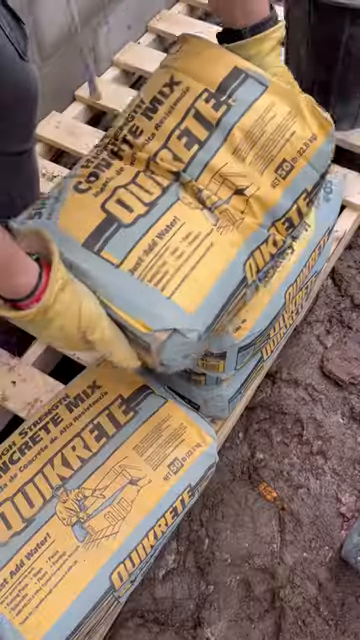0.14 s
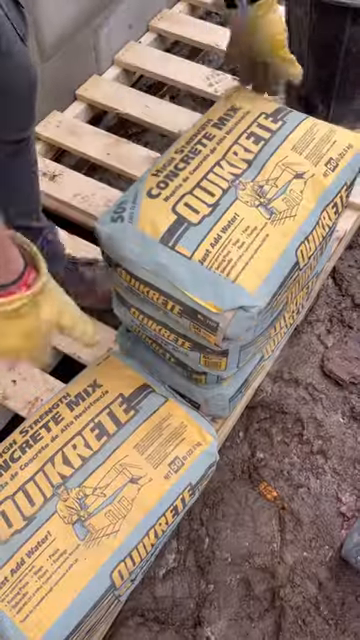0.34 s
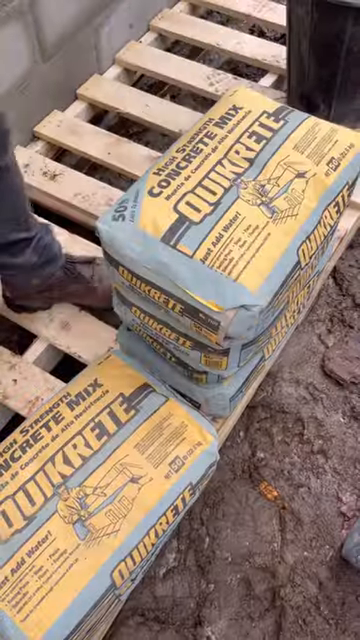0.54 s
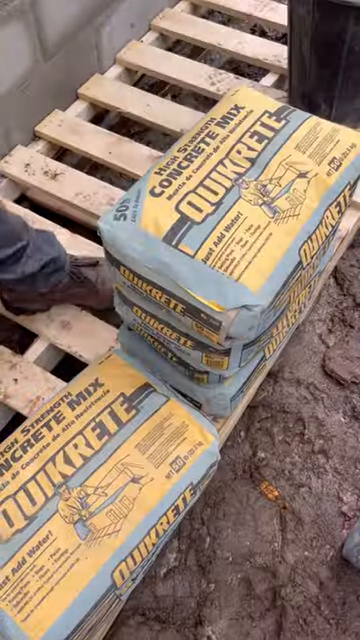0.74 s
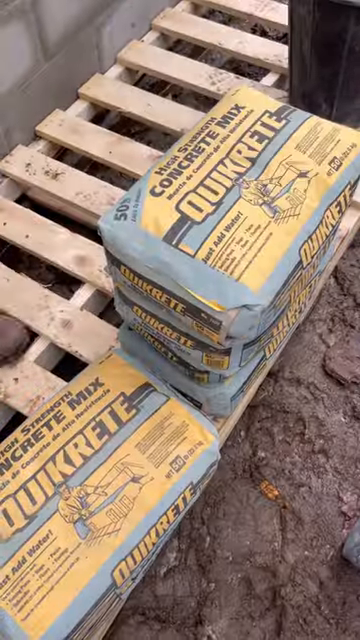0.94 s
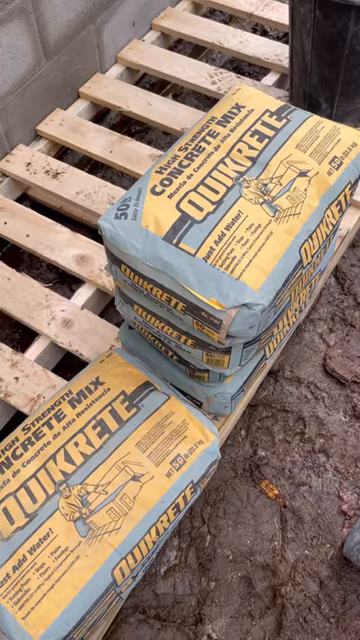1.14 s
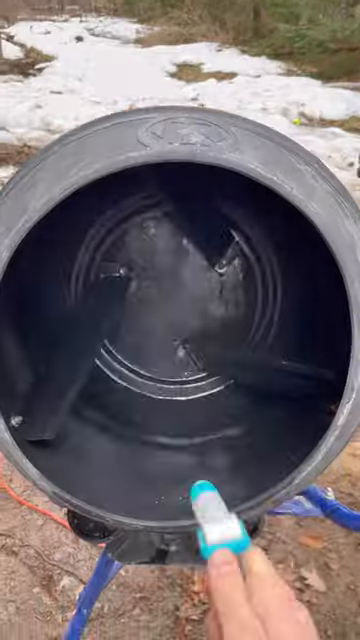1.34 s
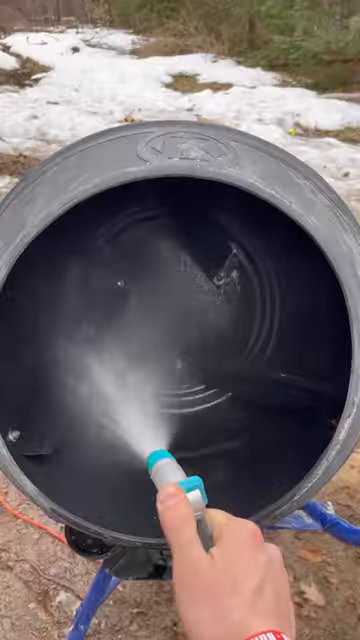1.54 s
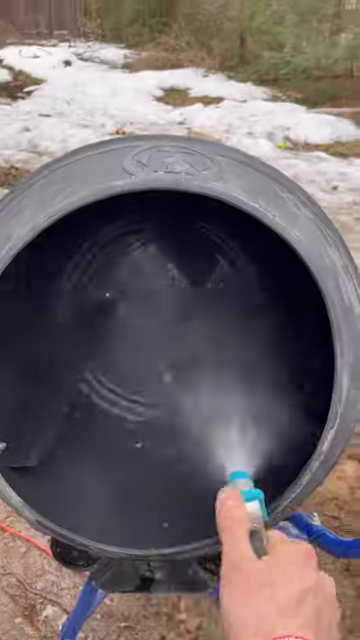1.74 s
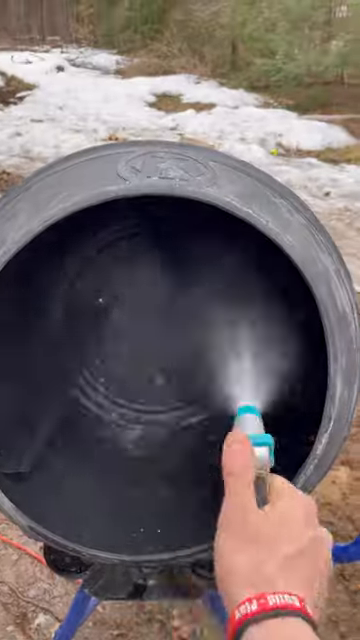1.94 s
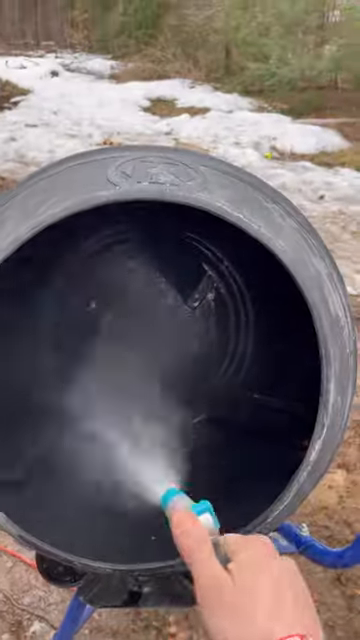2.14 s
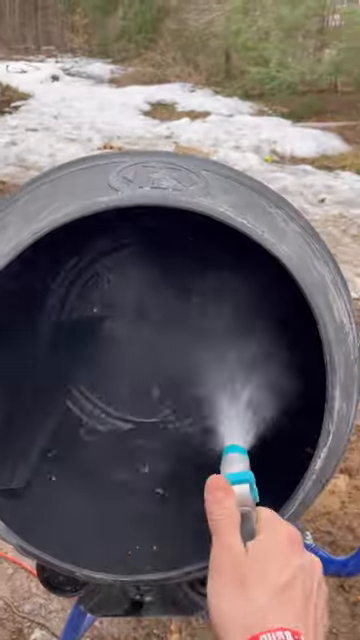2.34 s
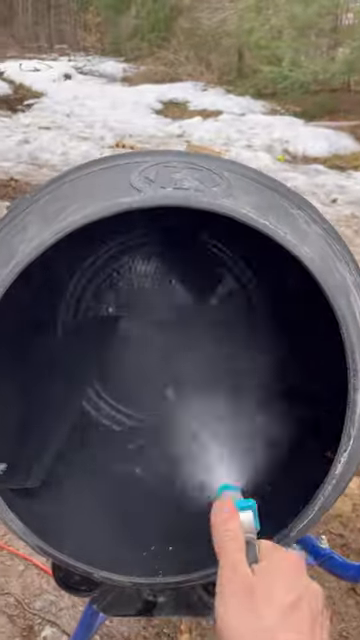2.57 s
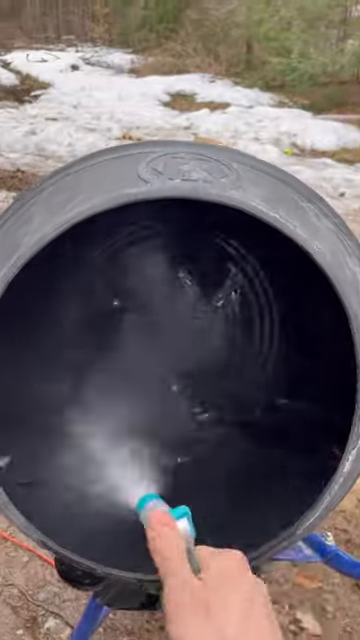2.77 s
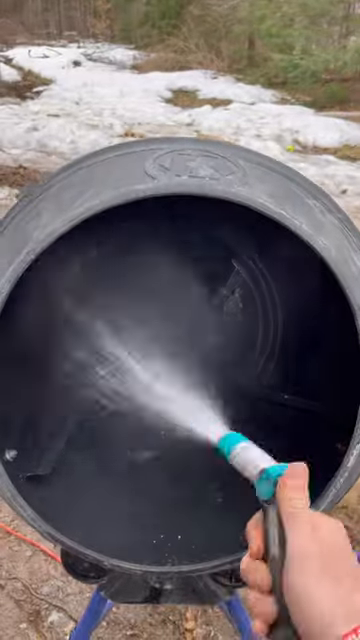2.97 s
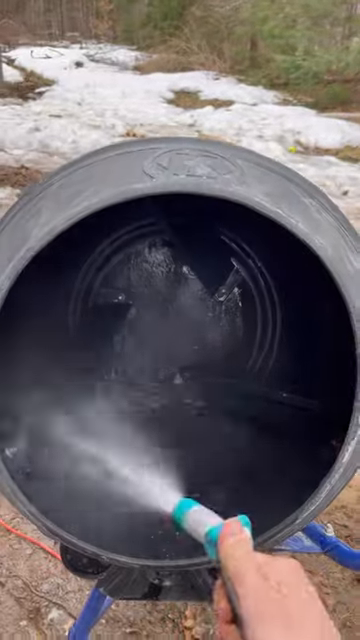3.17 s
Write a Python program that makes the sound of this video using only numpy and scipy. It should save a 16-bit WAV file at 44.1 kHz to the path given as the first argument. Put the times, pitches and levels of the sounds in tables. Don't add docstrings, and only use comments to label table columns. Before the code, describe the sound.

Outdoors and close up, a paper sack of dry mix lands with a loud crunch and wooden thud, followed by faint rustles and boot taps; an abrupt cut brings a nozzle click and sustained spray hissing inside a hollow drum.

```python
import sys
import numpy as np
from scipy import signal
from scipy.fft import rfft, irfft
from scipy.io import wavfile
from scipy.ndimage import map_coordinates

SR = 44100
rng = np.random.default_rng(int(sys.argv[2]) if len(sys.argv) > 2 else 0)


def convert_level_to_amplitude(level_db):
    exponent = np.asarray(level_db, float) / 20
    return 10 ** exponent


def dump(signal):
    limited = np.clip(np.atleast_2d(signal).T, -1, 1)
    pcm = np.round(limited * 32767).astype(np.int16)
    wavfile.write(sys.argv[1], SR, pcm)


N = 143325
CUT_S = 1.323
SIDES = np.array([[1], [-1]])


def rms_one(x):
    return x / np.sqrt(np.mean(x ** 2) + 1e-20)


def curve(rows):
    s, db = np.transpose(rows)
    return convert_level_to_amplitude(np.interp(np.arange(N) / SR, s, db, left=-200, right=-200))


def shape(x, points):
    hz, db = np.transpose(points)
    f = np.fft.rfftfreq(N, 1 / SR) + 1
    tilt = np.interp(np.log(f), np.log(hz), db)
    tilt = tilt - 30 * np.maximum(np.log2(hz[0] / f), 0)
    return irfft(rfft(x) * convert_level_to_amplitude(tilt), N)


def drift(rate):
    r = np.exp(-40 * np.pi * rate / SR)
    slow = signal.lfilter([1], [1, -2 * r, r * r], rng.standard_normal(N // 20 + 2002))[2000:]
    return np.interp(np.arange(N) / 20, np.arange(len(slow)), rms_one(slow))


def peak(x, hz, width_hz):
    r = np.exp(-np.pi * width_hz / SR)
    poles = [1, -2 * r * np.cos(2 * np.pi * hz / SR), r * r]
    return signal.lfilter(np.array([1, 0, -1]) * (1 - r * r) / 2, poles, x)


def ring(x, hz, t60):
    r, w = convert_level_to_amplitude(-60 / (t60 * SR)), 2 * np.pi * hz / SR
    return signal.lfilter([0, np.sin(w)], [1, -2 * r * np.cos(w), r * r], x + 1e-18)


def butter(x, order, hz, kind="low"):
    return signal.sosfilt(signal.butter(order, hz, kind, fs=SR, output="sos"), x)


def grains(rate, spread_db, share):
    sizes = convert_level_to_amplitude(spread_db * np.minimum(rng.exponential(1, N), 3)) * rng.choice([-1, 1], N)
    clicks = rms_one(sizes * (rng.random(N) < rate / SR))
    share = np.clip(share, 0, 1)
    return np.sqrt(share) * clicks + np.sqrt(1 - share) * rng.standard_normal(N)


def swells(rows, length=None):
    t = np.arange(N) / SR
    return sum(convert_level_to_amplitude(row[-1]) * np.exp(-(2 * (t - row[0]) / (length or row[1])) ** 2) for row in rows)


def snaps(rows, sharp, t60):
    size = 4000
    out, t = np.zeros(N + size), np.arange(size) / SR
    for s, db, hz in rows:
        burst = rng.standard_normal(size) * convert_level_to_amplitude(-60 * t / t60) * np.minimum(t / 0.00088, 1)
        broad = butter(np.diff(burst, prepend=0), 2, min(5.0 * hz, 20000))
        burst = 0.56 * broad + sharp * peak(burst, hz, 0.62 * hz)
        start = int(s * SR)
        out[start:start + size] += convert_level_to_amplitude(db) * burst / np.abs(burst).max()
    return out[:N]


def wander(x):
    at = np.cumsum(1 + 0.018 * drift(6.0))
    return map_coordinates(x, [at % (N - 1)], order=3)


def spread(mid, points, lag):
    side = shape(np.roll(signal.hilbert(mid).imag, lag), points)
    return mid + side * convert_level_to_amplitude(3.0 * drift(6.9)) * SIDES


# f/Hz, level/dB
YARD_SPECTRUM = [(35, -55), (60, -9.5), (135, -6.5), (246, -15.5), (271, -17.5), (1000, -43.5), (1300, -75),
                 (2200, -120)]


def yard_rumble():
    return convert_level_to_amplitude(-69 + 2.5 * drift(20)) * rms_one(shape(rng.standard_normal(N), YARD_SPECTRUM))


def rumble_apart():
    return convert_level_to_amplitude(-69 - 9.5) * rms_one(peak(rng.standard_normal(N), 240, 300)) * SIDES


# f/Hz, level/dB
WOODS_SPECTRUM = [(59, -57), (100, -30), (381, -10.5), (3250, -22), (10700, -28), (16000, -33)]


def woods_air():
    air = rms_one(np.array([shape(rng.standard_normal(N), WOODS_SPECTRUM) for side in range(2)]))
    air = convert_level_to_amplitude(-59) * (np.arange(N) < 1.46 * SR) * air
    return air[0] + convert_level_to_amplitude(-10.5) * air[1] * SIDES


# f/Hz, level/dB, t60/s
BOARD_MODES = [(165, 3, 0.07), (345, 0, 0.05), (600, 1, 0.03), (760, 1, .03), (940, -3, .02),
               (1340, 3, .04), (2650, -8, .025)]


def boot_step():
    t = np.arange(N) / SR - 1.089
    length_s, board_db, grit_db = 0.032, -52, -51.5
    fade = convert_level_to_amplitude(-260 * np.maximum(t, 0) - 600 * np.maximum(t - length_s, 0))
    drive = grains(2890, 2.4, 0.96) * np.clip(t / 0.0014, 0, 1) * fade
    board = sum(convert_level_to_amplitude(db) * ring(drive, hz, t60) for hz, db, t60 in BOARD_MODES)
    grit = signal.lfilter([1], [1, -0.75], drive)
    return convert_level_to_amplitude(board_db - 22.5) * board + convert_level_to_amplitude(grit_db) * grit


def hose_knock():
    start_s, level_db, t60_s, rise_s, stop_s = 1.2513, -35.3, 0.3, 0.00025, 0.0111
    sweep_turns, lag_s, end_hz = 1.012, 0.00025, 14
    t = np.maximum(np.arange(N) / SR - start_s, 0)
    turns = sweep_turns * np.log(1 + t / lag_s) + end_hz * t
    envelope = convert_level_to_amplitude(level_db - 60 * t / t60_s) * np.minimum(t / rise_s, 1) * np.clip((stop_s - t) / 0.004, 0, 1)
    knock = envelope * np.sin(2 * np.pi * turns)
    knock = signal.sosfiltfilt(signal.butter(2, 2800, fs=SR, output="sos"), knock)
    return knock * (1 + convert_level_to_amplitude(-19.5) * SIDES)


# t/s, peak level/dB, f/Hz
KNOCKS = [
    (.0, -51, 312),
    (.079, -39.5, 590),
    (.466, -56, 755),
    (.678, -50, 297),
    (.785, -57.5, 590),
    (1.15, -76, 300),
    (1.292, -57, 1110),
    (1.303, -65, 500),
]


def knocks():
    return snaps(KNOCKS, sharp=30.0, t60=0.058)


# t/s, level/dB
RUSTLE = [(0, -63.5), (.085, -53), (.13, -62), (.185, -61.5), (.4, -60.5), (.43, -67), (.47, -65),
          (.52, -60), (.56, -73.5), (.6, -55), (.66, -52), (.71, -67), (.76, -69), (1.0, -64),
          (1.08, -65.5), (1.16, -86.5), (1.24, -79.5), (1.322, -80)]
# f/Hz, level/dB
CLOTH = [(240, -49.5), (400, -26.5), (814, -11.5), (1420, -13.5), (1680, -9.5), (4500, -4.5), (8500, -7.5),
         (13000, -2.5)]
# t/s, length/s, level/dB
SLIDE = [
    (.232, 0.021, -35),
]


def handling():
    fibres = grains(3000, 3.0, 0.2)
    rustle = 0
    for k, hz in enumerate(np.geomspace(500, 15000, 9)):
        band = peak(fibres, hz, 0.6 * hz) * (-1) ** k / np.sqrt(hz)
        rustle = rustle + convert_level_to_amplitude(1.2 * drift(45)) * band
    rustle = rms_one(shape(rustle, CLOTH))
    slide = rms_one(peak(fibres, 13000, 5500))
    return rustle * curve(RUSTLE) + slide * swells(SLIDE)


# t/s, level/dB
THUMPS = [
    (0.25, -24.5),
    (0.263, -16.5),
    (0.281, -21.5),
    (.309, -40),
    (0.331, -34.5),
    (0.364, -43.5),
    (1.2626, -53.5),
    (1.297, -56),
    (1.311, -53),
]
# f/Hz, level/dB, t60/s
PALLET_MODES = [(126, -6, 0.12), (170, -4, 0.035), (378, -12, .04), (487, -15, 0.038), (720, -13.5, 0.048)]


def pallet_thumps():
    s, db = np.transpose(THUMPS)
    out = 0
    for hz, level_db, t60 in PALLET_MODES:
        clicks = np.zeros(N)
        clicks[(s * SR).astype(int)] = convert_level_to_amplitude(db + level_db)
        blows = signal.lfilter([0.12], [1, -0.88], clicks)
        out = out + ring(blows, hz, t60)
    return out


# t/s, level/dB
LANDING = [(.19, -66.5), (.228, -42.5), (.245, -39.5), (.249, -22.5), (.253, -26), (.258, -20.5),
           (.268, -21.5), (.273, -16.5), (.279, -22), (.282, -26.5), (.31, -49.5), (.335, -36.5),
           (.36, -65)]
# f/Hz, level/dB
PAPER = [(180, -18.5), (400, -7.5), (800, -10.5), (1500, -7), (2100, -11.5), (4440, -8), (16000, -13)]
# t/s, peak level/dB, f/Hz
SNAPS = [(.0525, -37.5, 11400), (.07, -30, 12100), (.077, -38, 3000), (.087, -36, 12000),
         (.123, -48, 12000), (.1535, -43, 4000), (.157, -32, 2800), (.2475, -14, 2500), (.2625, -14, 3030),
         (.274, -1.5, 4500), (.2945, -21, 7000), (.304, -23.5, 5150), (.325, -29.5, 3000),
         (.3325, -15, 3700), (.3625, -14.5, 6000), (.463, -45, 2880), (.59, -47, 2000), (.61, -35, 4430),
         (.653, -32, 5100), (.784, -52.5, 1500), (.7, -47.5, 4500), (.85, -53, 1990), (.918, -49, 4070),
         (1.27, -49, 3820), (1.312, -54, 5000)]


def sack_landing():
    crackle = grains(3200, 6.7, 0.28) * convert_level_to_amplitude(2.0 * drift(93))
    crackle = rms_one(shape(crackle, PAPER))
    return crackle * curve(LANDING) + snaps(SNAPS, sharp=1.8, t60=0.011)


# f/Hz, level/dB
SIDE_YARD = [(200, -46.5), (500, -29), (1200, -9.5), (3300, -28), (4800, -7.5), (8500, -2.5), (10200, 5),
             (11500, -16), (13500, -5)]


def yard():
    on = np.arange(N) < CUT_S * SR
    mid = (sack_landing() + handling() + knocks() + pallet_thumps() + boot_step() + yard_rumble()) * on
    for stage in range(2):
        mid = mid - peak(mid, 9630, 520)
    return spread(mid, SIDE_YARD, 61) + rumble_apart() * on + hose_knock()


# t/s, peak level/dB, f/Hz
TRIGGER = [
    (1.323, -41, 630),
    (1.435, -35, 510),
]


def trigger():
    return snaps(TRIGGER, sharp=5.4, t60=0.03)


# t/s, length/s, level/dB
PUFFS = [(1.64, 0.037, -66), (1.8, 0.1, -65.5), (1.87, 0.039, -66), (2.23, .06, -65), (2.31, 0.085, -69),
         (2.43, 0.045, -71), (2.5, 0.05, -72), (2.78, 0.19, -66.5), (3.16, 0.08, -64.5)]
# f/Hz, level/dB
PUFF_SPECTRUM = [(110, -30), (200, 6.5), (450, 4.5), (800, -6), (1500, -57)]


def air_puffs():
    puff = swells(PUFFS) * rms_one(shape(rng.standard_normal(N), PUFF_SPECTRUM))
    return puff * (1 + convert_level_to_amplitude(-14) * SIDES)


# t/s, level/dB
SLAPS = [
    (1.9, -57),
    (1.94, -58),
    (2.97, -60),
    (3.055, -55),
]


def water_slaps():
    hz, length_s = 244, 0.039
    slap = peak(peak(peak(rng.standard_normal(N), hz, 140), hz, 170), hz, 200)
    return swells(SLAPS, length_s) * rms_one(slap)


# t/s, level/dB
MISTS = [(1.52, -41), (1.61, -32.5), (1.83, -29.5), (2.0, -35.5), (2.2, -35), (2.33, -37), (2.43, -36),
         (2.52, -44), (2.64, -32), (2.86, -32.5), (2.99, -38)]


def mist_bursts():
    return swells(MISTS, 0.05) * rms_one(butter(grains(5400, 1.6, 0.66), 3, 9700, "high"))


# f/Hz, width/Hz, level/dB
PADDLE_MODES = [(1500, 97, 2), (1734, 137, 1.5), (1900, 127, 2.5), (2025, 29, 4), (2325, 82, -1)]
# t/s, length/s, level/dB
PADDLE_HITS = [(1.472, 0.024, -40.5), (1.497, 0.035, -36.5), (1.527, 0.04, -33.5), (1.7, 0.051, -40),
               (1.76, 0.094, -49), (2.045, 0.023, -38.5), (2.175, 0.055, -44), (2.39, 0.027, -41.5),
               (2.59, 0.086, -45), (2.78, 0.058, -48), (2.915, 0.067, -37.5), (2.962, 0.038, -36.5),
               (3.06, 0.22, -50.5), (3.21, 0.19, -49)]


def paddle_rasp(drops):
    rasp = 0.4 * peak(drops, 3060, 2270)
    for hz, w, db in PADDLE_MODES:
        rasp = rasp + convert_level_to_amplitude(db + 2.2 * drift(30)) * peak(peak(drops, hz, 6 * w), hz, w)
    return swells(PADDLE_HITS) * rms_one(rasp)


# f/Hz, width/Hz, level/dB
CAVITY_MODES = [(351.5, 61, -11.5), (459.7, 27, -9.5), (536.8, 44.4, 0.5), (724, 110, -16.5)]
# t/s, level/dB
FLARES = [(1.58, -54), (1.69, -58), (1.86, -52.5), (1.96, -51), (2.0, -65), (2.15, -44.5), (2.33, -43.5),
          (2.54, -44.5), (2.64, -50), (2.68, -54), (2.81, -46.5), (3.07, -74), (3.15, -55.5), (3.24, -46)]
# t/s, level/dB
CROSS_FLARES = [
    (1.52, -57.5),
    (1.79, -46),
    (2.42, -53),
    (2.62, -49),
    (2.9, -66),
    (3.19, -55),
]


def cavity_hum(drops, force):
    fill_s, flare_s = 0.086, 0.044
    opening = force / np.median(force[force > 1e-4])
    pole = 1 / (fill_s * SR)
    fill = signal.lfilter([pole], [1, pole - 1], np.minimum(opening, 1))
    hum = sum(convert_level_to_amplitude(db + drift(25.0)) * peak(peak(drops, hz, 3 * w), hz, w) for hz, w, db in CAVITY_MODES)
    cross = rms_one(peak(peak(drops, 510, 130), 457, 55))
    level = convert_level_to_amplitude(-55.5) * fill + swells(FLARES, flare_s)
    return level * rms_one(hum) + swells(CROSS_FLARES, flare_s) * cross


# f/Hz, width/Hz, level/dB
WALL_MODES = [(2020, 100, -8), (4160, 284, -1.5), (5000, 570, -1), (7380, 600, -6.5), (8340, 380, -3.5),
              (10220, 890, -8), (14100, 220, -5)]
# f/Hz, level/dB
SPRAY = [(120, -19), (300, -13), (535, -3.5), (1070, -8), (2000, -3), (5000, -6), (9000, -1.5),
         (16000, -1.5)]
# t/s, level/dB
SURGES = [(1.52, -38), (1.6, -45), (1.65, -40), (1.685, -44), (1.735, -43.5), (1.92, -48), (2.0, -39.5),
          (2.05, -63), (2.18, -39.5), (2.33, -69), (2.383, -36.5), (2.42, -52), (2.555, -46), (2.59, -40),
          (2.645, -44), (2.7, -43), (2.88, -48), (2.95, -43.5), (3.06, -40), (3.145, -41)]


def wall_hiss(drops, force):
    wall = drops * convert_level_to_amplitude(1.0 * drift(25))
    for hz, w, db in WALL_MODES:
        wall = wall + convert_level_to_amplitude(db + 12 + 1.8 * drift(18)) * wander(peak(drops, hz, w))
    hiss = force * convert_level_to_amplitude(0.7 * drift(40)) * rms_one(shape(wall, SPRAY))
    surge_hz, width_hz, surge_s = 4500, 2760, 0.026
    surge = rms_one(peak(peak(wall, surge_hz, width_hz), surge_hz, 2 * width_hz))
    return hiss + swells(SURGES, surge_s) * surge


# t/s, level/dB
JET_FORCE = [(1.41, -66), (1.432, -51), (1.435, -41.5), (1.447, -35), (1.452, -49), (1.47, -35.5),
             (1.522, -32), (1.555, -34.5), (1.79, -35), (2.0, -35), (2.1, -36.5), (2.24, -36), (2.3, -34),
             (2.48, -35.5), (2.55, -34.5), (2.79, -36), (2.9, -36.5), (3.25, -39)]


def jet():
    force = curve(JET_FORCE)
    drops = grains(9000, 3.9, 0.25)
    driven = wall_hiss(drops, force) + cavity_hum(drops, force) + paddle_rasp(drops)
    return driven + mist_bursts() + water_slaps()


# f/Hz, level/dB
SIDE_DRUM = [(300, -39), (1500, -41), (3800, -34.5), (4900, -17.5), (6200, -43), (12500, -30.5),
             (15500, -15)]


def drum():
    on = np.arange(N) >= CUT_S * SR
    mid = butter(jet() + trigger(), 2, 170, "high")
    return (air_puffs() + spread(mid, SIDE_DRUM, int(SR / 50)) + woods_air()) * on


def scene():
    return yard() + drum()


def roll_off(x):
    return signal.sosfilt(signal.butter(12, 16700, fs=SR, output="sos"), x)


def record(dry):
    x = butter(dry, 3, 97, "high")
    x = 0.6 * np.tanh(x / 0.6)
    x = signal.sosfilt(signal.cheby2(14, 60, 16200, fs=SR, output="sos"), x)
    return roll_off(x)


dry = scene()
out = record(dry)
dump(out)
```